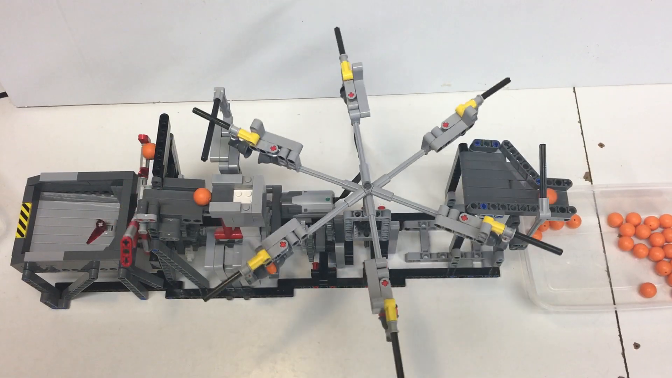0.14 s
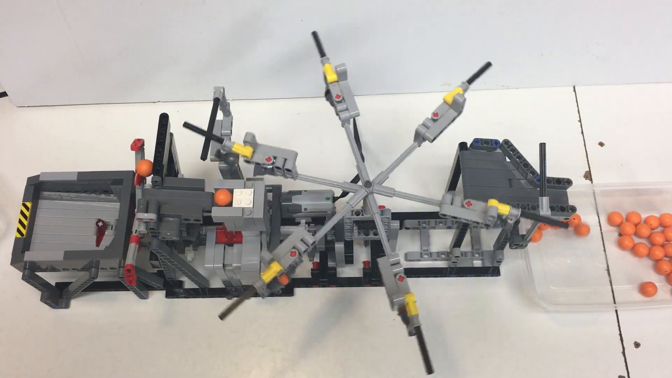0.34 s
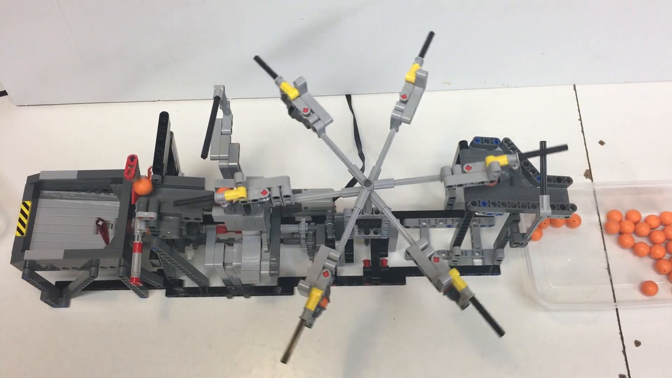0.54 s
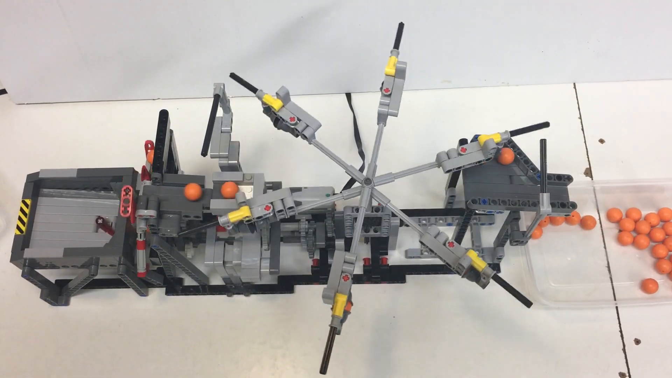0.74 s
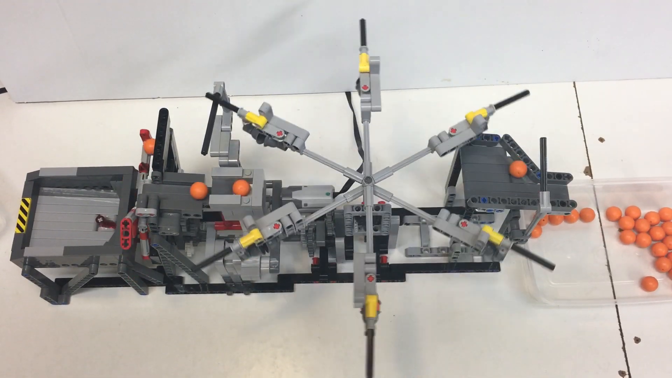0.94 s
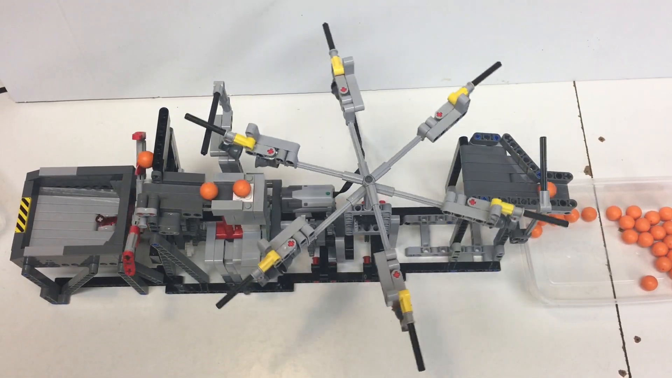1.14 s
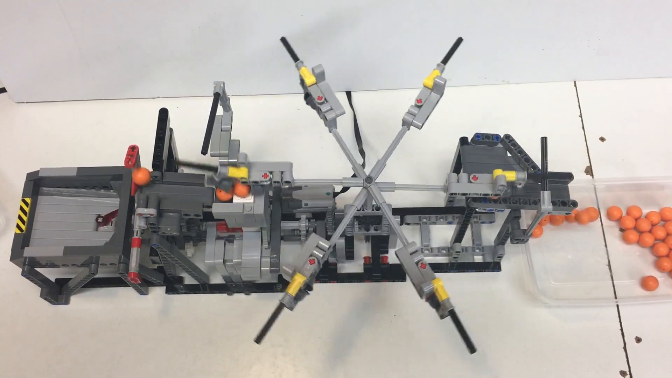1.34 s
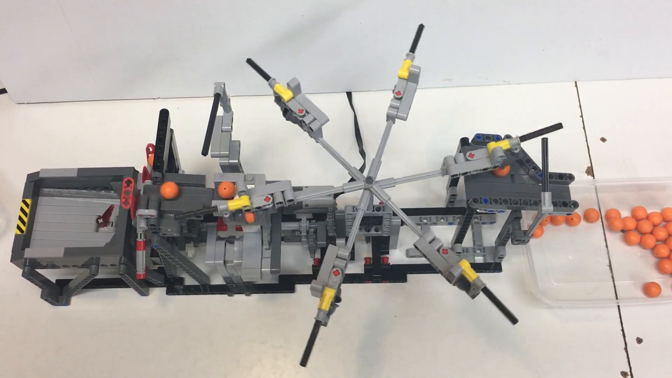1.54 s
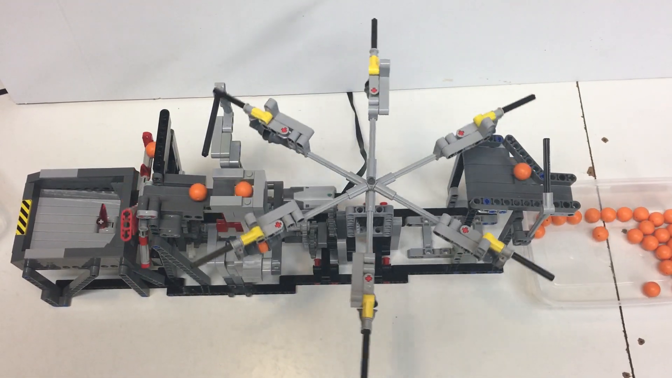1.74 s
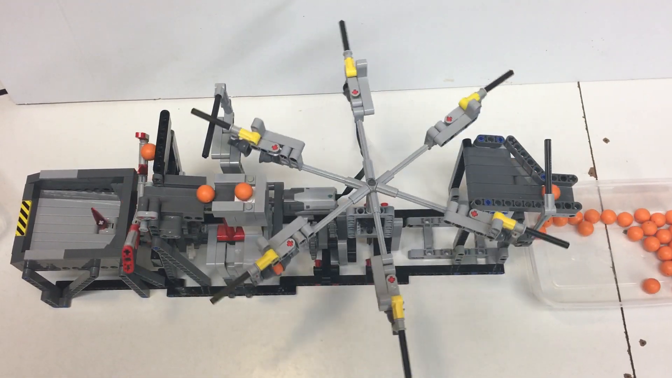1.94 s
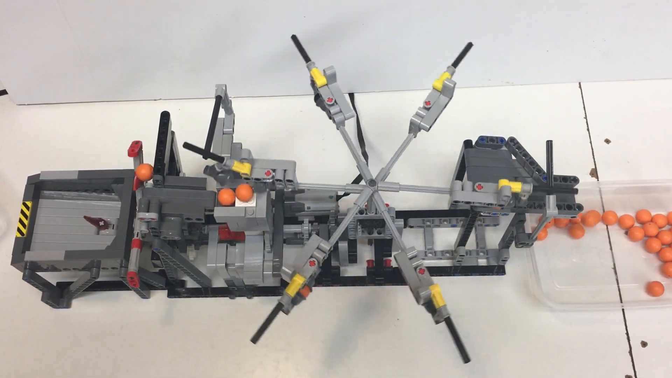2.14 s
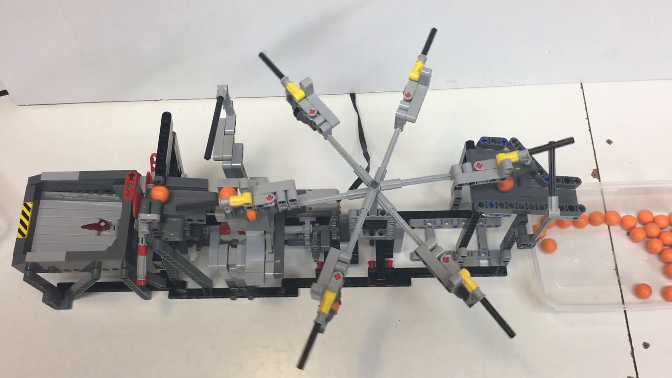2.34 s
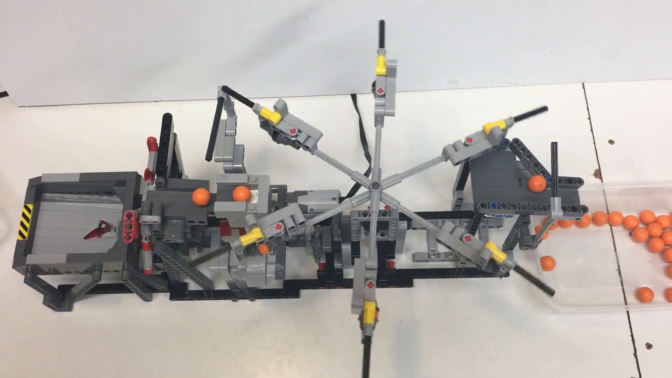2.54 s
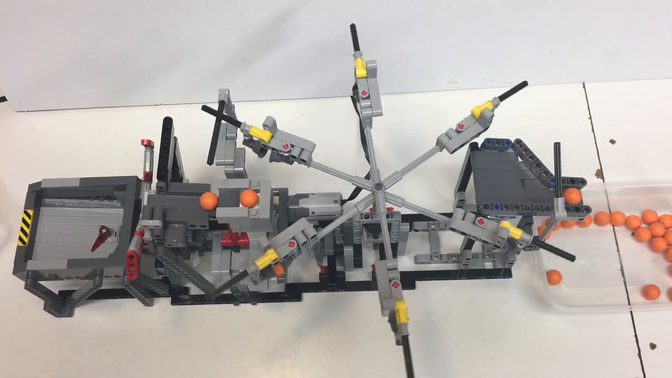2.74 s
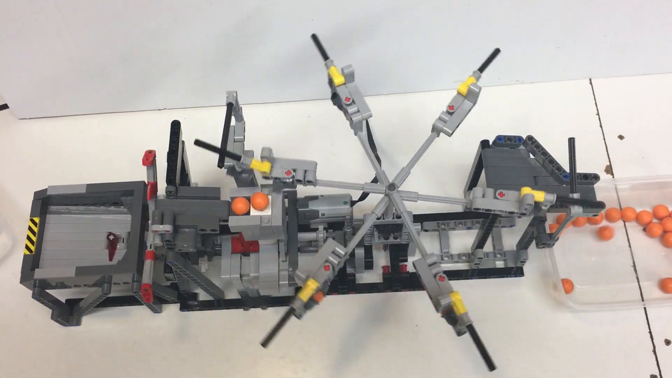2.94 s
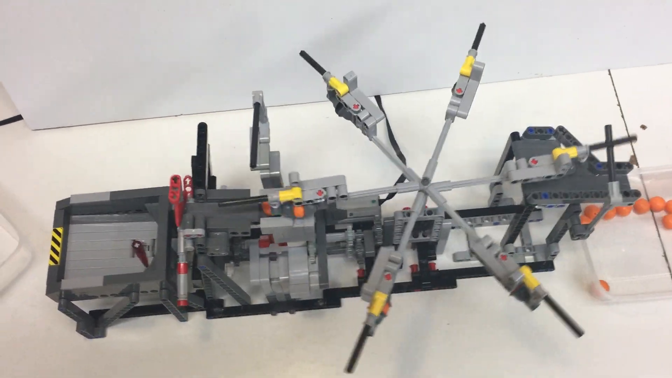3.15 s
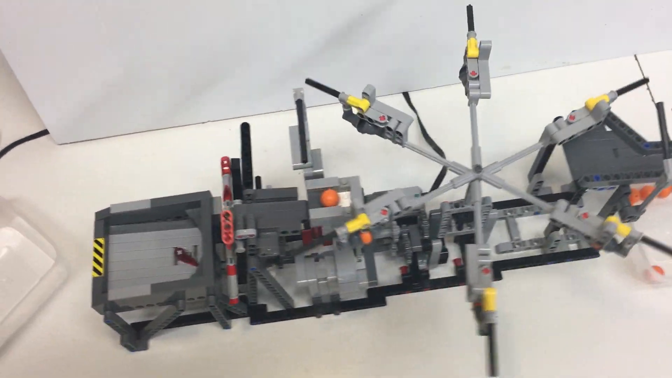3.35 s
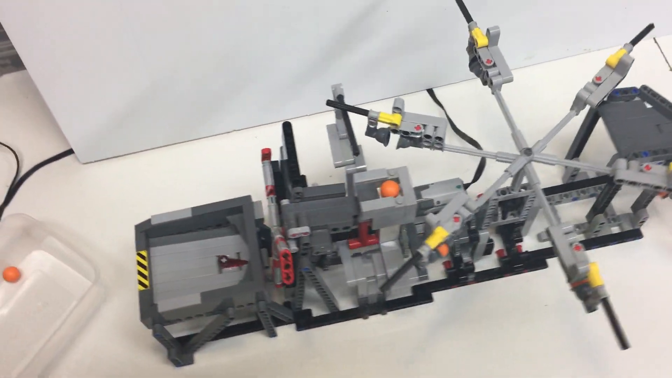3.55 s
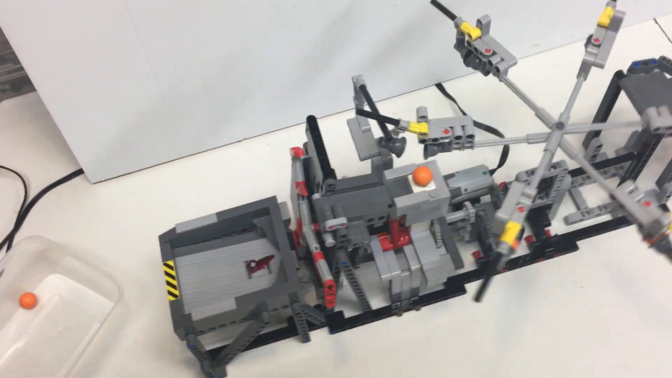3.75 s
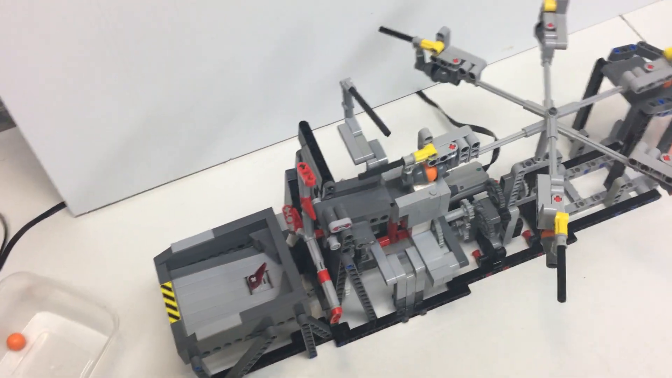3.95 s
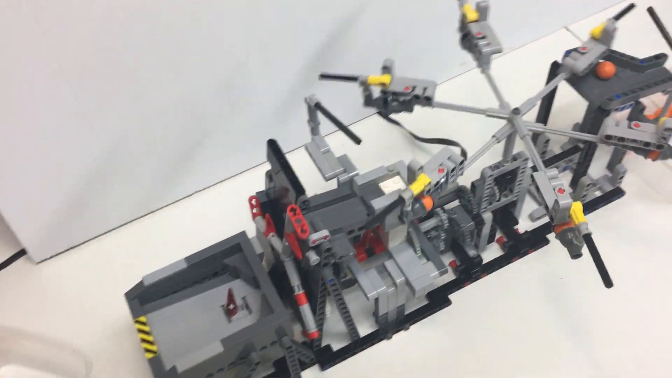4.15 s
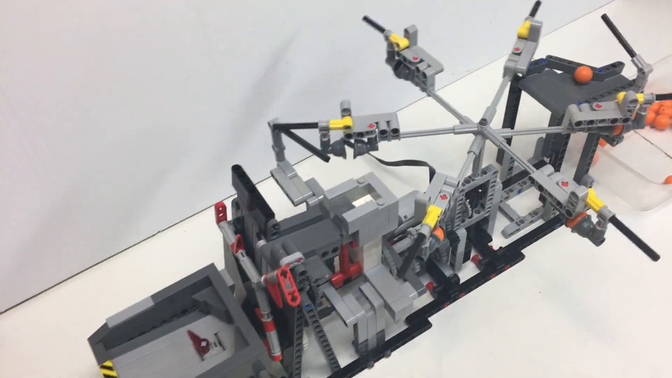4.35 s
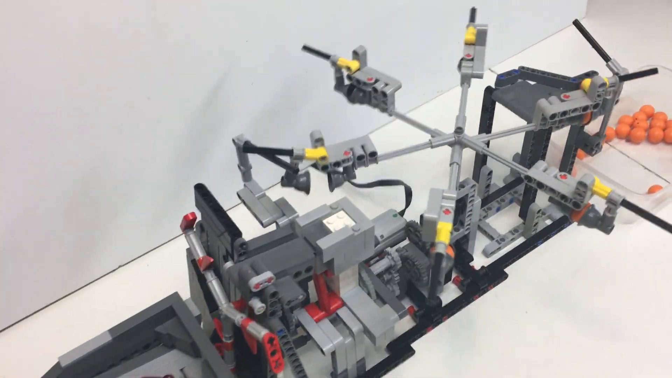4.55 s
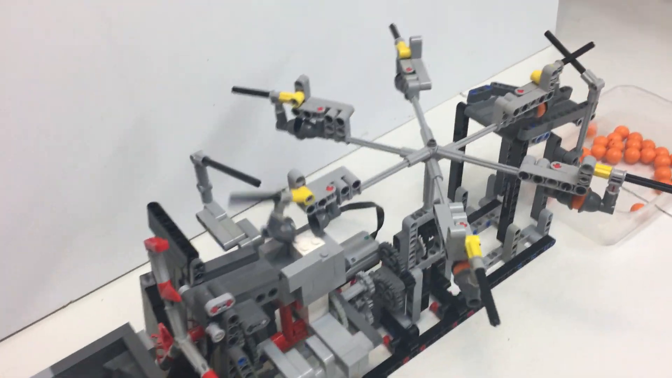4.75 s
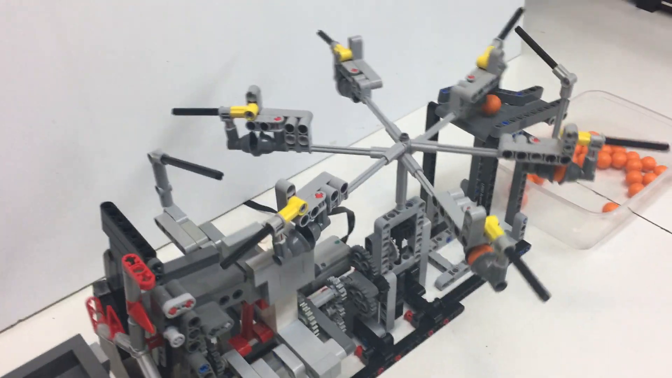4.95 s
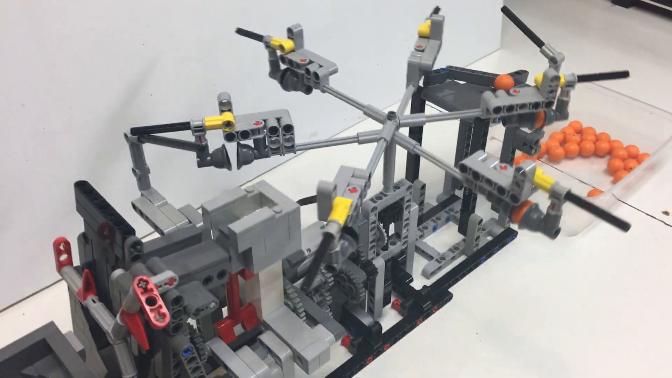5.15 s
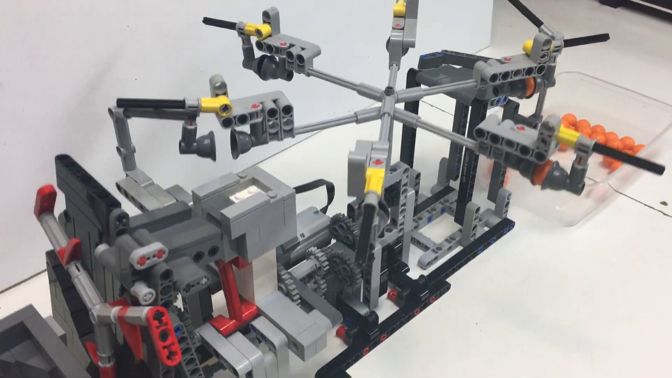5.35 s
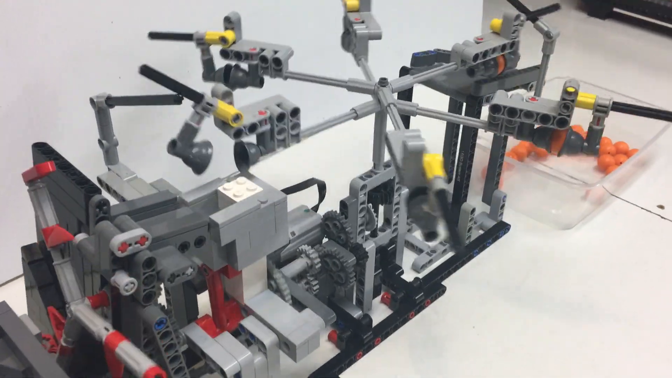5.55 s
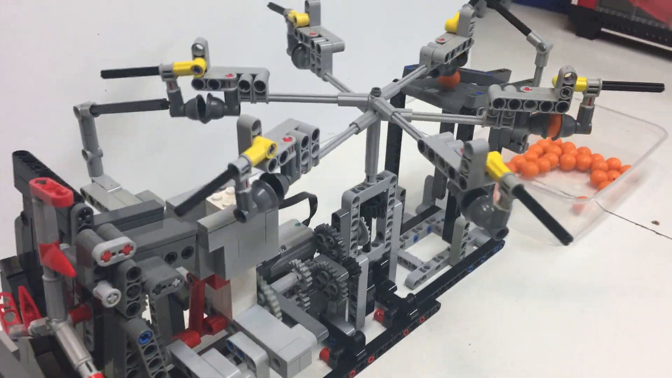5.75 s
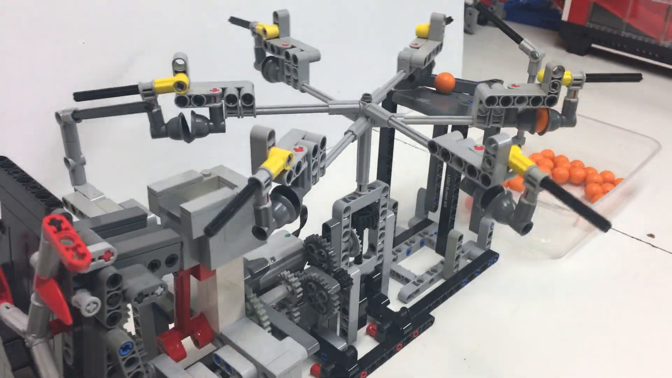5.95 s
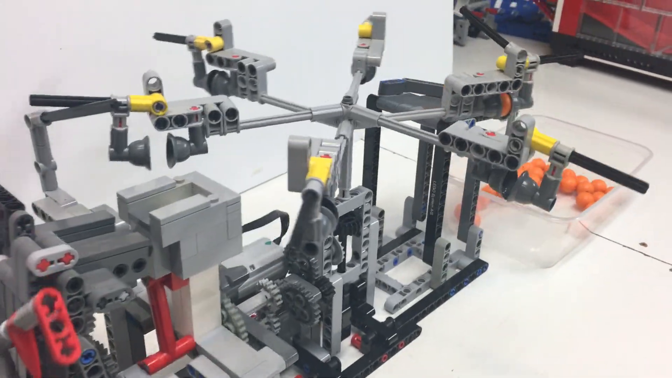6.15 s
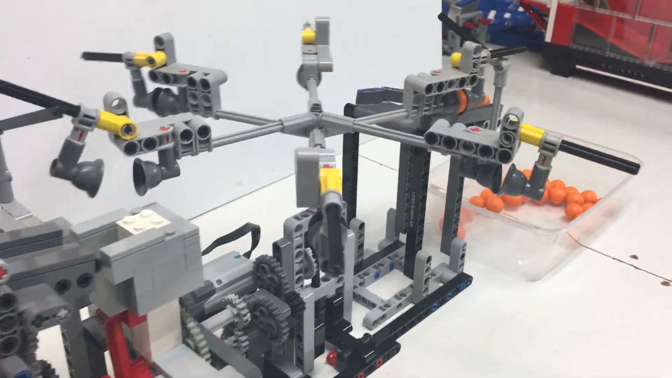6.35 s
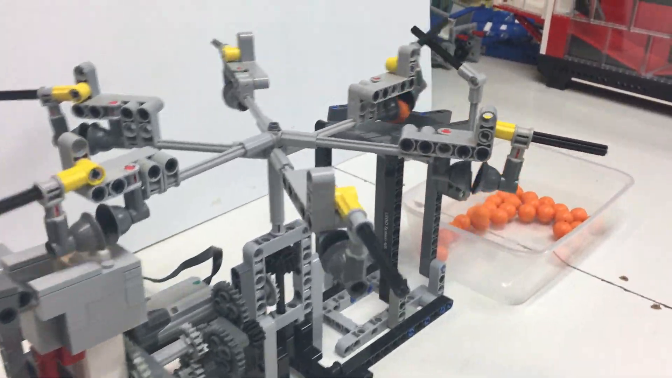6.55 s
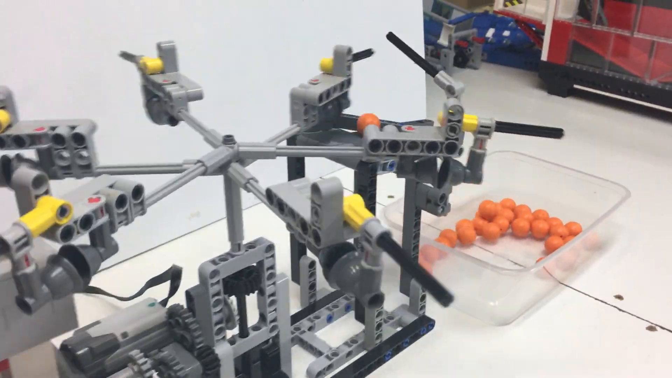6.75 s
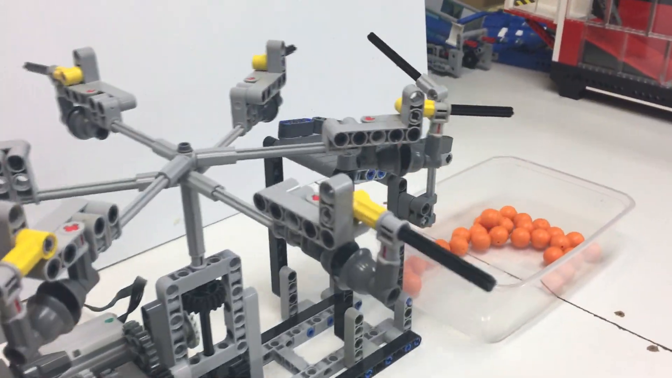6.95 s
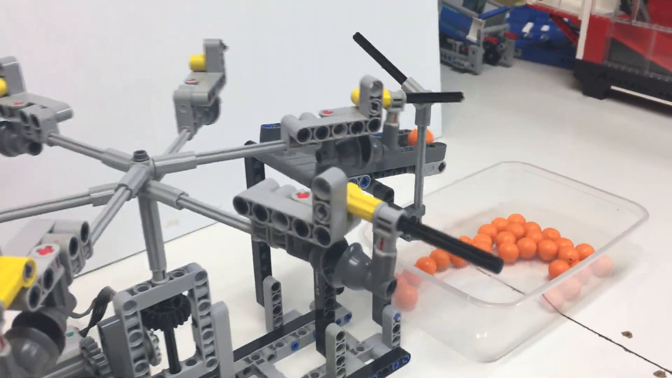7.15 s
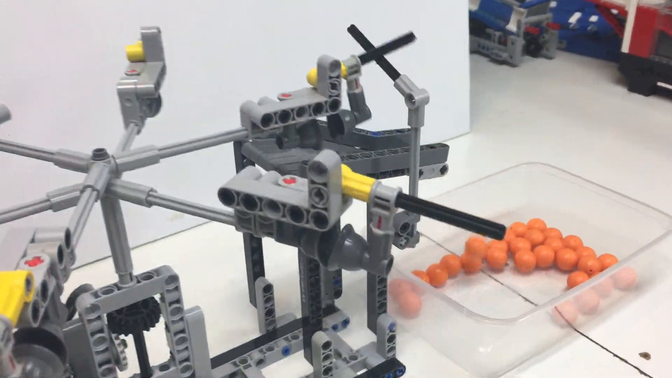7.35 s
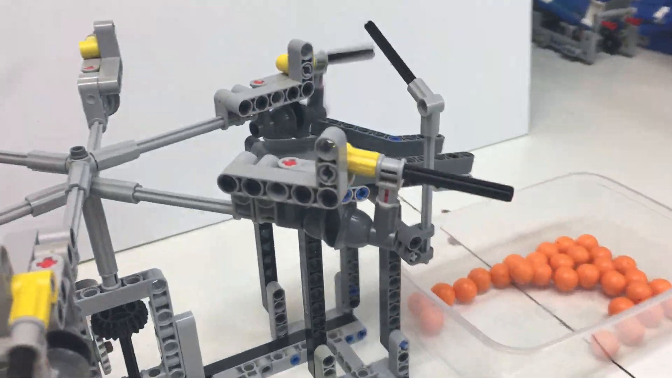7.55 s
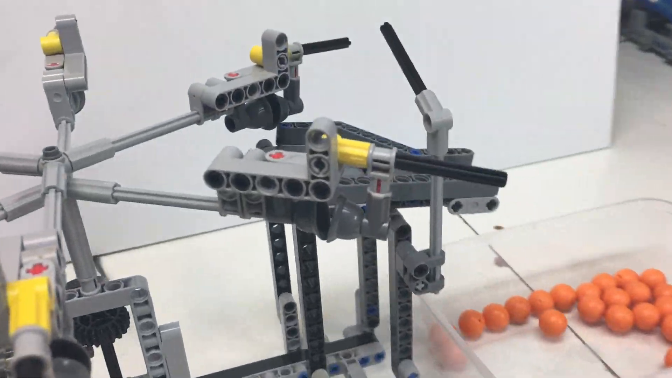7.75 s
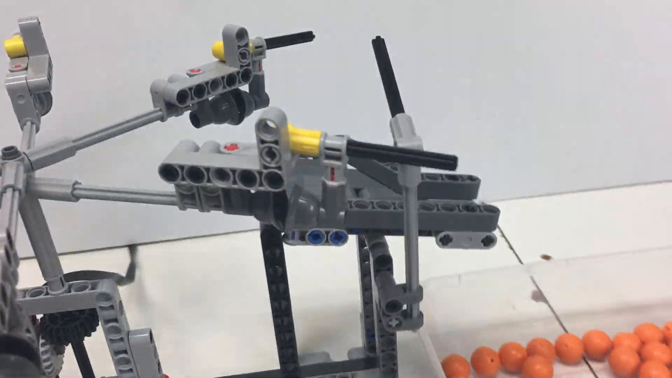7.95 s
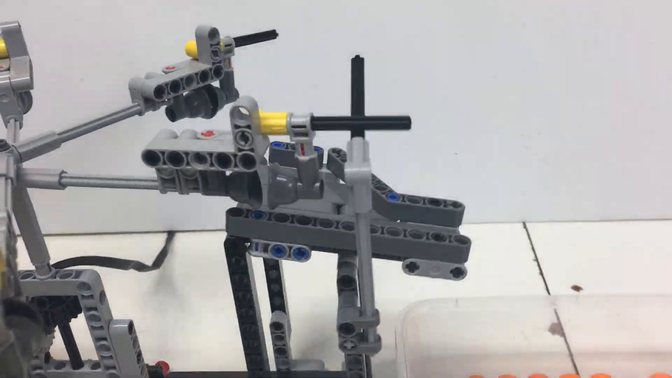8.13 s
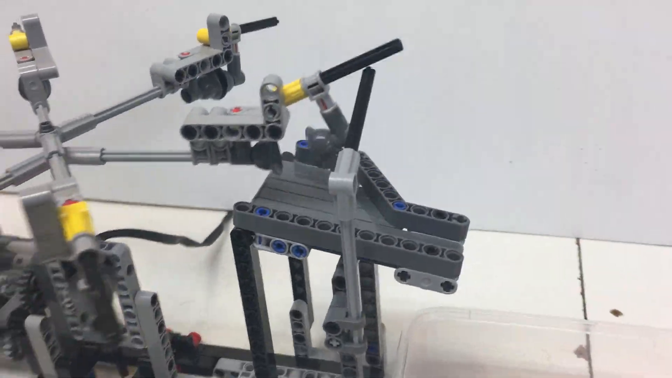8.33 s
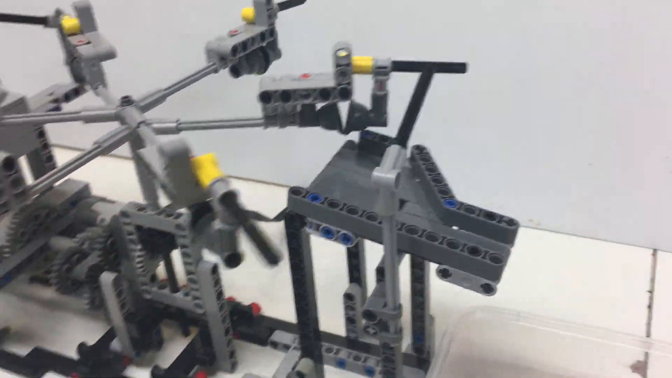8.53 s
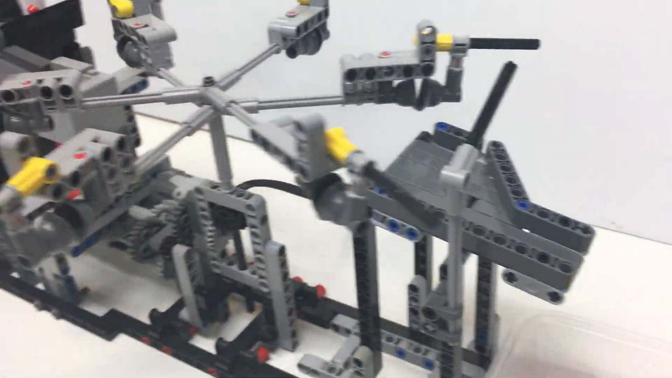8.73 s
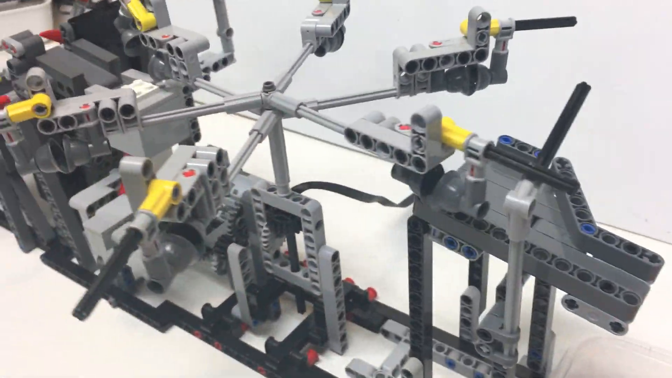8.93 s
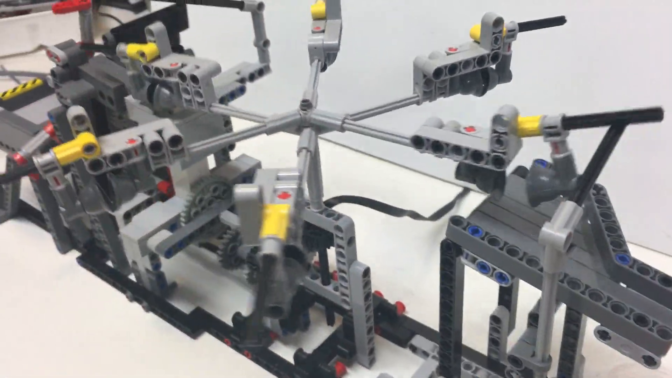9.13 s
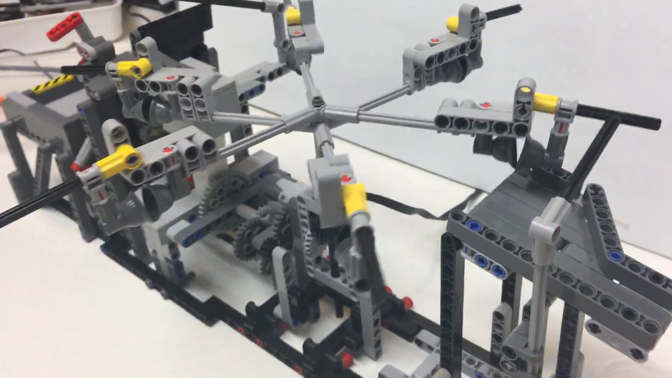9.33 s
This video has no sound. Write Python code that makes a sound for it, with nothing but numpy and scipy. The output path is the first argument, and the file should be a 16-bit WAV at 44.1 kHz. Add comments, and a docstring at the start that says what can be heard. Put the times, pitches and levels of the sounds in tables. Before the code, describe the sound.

Steady motor whirr and chattering plastic gears, with sharp hollow clacks about every second or less, over faint rumble in a quiet room.

```python
"""On a hard floor a plastic brick machine whirrs while arms snap and balls knock through its frame.
The whirr is noise coloured by the place of a hand-held microphone moving round it, with thin motor tones;
gear teeth and one tight spot on a wheel strike the gear case's modes; blows excite frame and base plate.
A short diffuse tail follows ticks and knocks. Low rumble lies beneath, and an engine outside, a sum of
sine orders of its firing rate, drones during the first seconds."""
import sys
import numpy as np
from scipy import signal
from scipy.io import wavfile
from scipy.ndimage import uniform_filter1d

SR = 44100
rng = np.random.default_rng(int(sys.argv[2]) if len(sys.argv) > 2 else 0)


def to_wav(sig):
    """Store sig (one row per channel, or 1-D mono) as 16-bit WAV at the path in sys.argv[1].

    Samples outside -1..1 are clipped; the rate is SR.
    """
    pcm = np.clip(np.atleast_2d(sig), -1, 1) * 32767
    pcm = np.round(pcm).astype(np.int16)
    wavfile.write(sys.argv[1], SR, pcm.T)  # frames by channels


N = 418509
T = np.arange(N) / SR  # time in seconds

# The microphone's walk. Each row: time in seconds, whirr level in dB, place from 0 (above)
# round to 3 (behind), gear case level in dB.
WALK = [(0, -43.5, 0.59, -51), (1.2, -44, 0.57, -56), (2.8, -44, 0.63, -50.5), (3.6, -46, 1.15, -60),
        (4.6, -45.5, 2.09, -52), (5.4, -43, 2.06, -108), (6.3, -42.5, 2.08, -51.5), (7.1, -42, 2.09, -46),
        (7.9, -41.5, 2.42, -50.5), (9.49, -44.5, 2.27, -46.5)]
WALK_S, WHIRR_DB, PLACE, CASE_DB = np.transpose(WALK)
# Spectrum of the whirr at each of four places along the walk.
# Each row of a place: frequency in Hz, relative level in dB per Hz.
VIEWS = [
    [(350, -42), (600, -5), (717, -26), (778, -25), (868, -7), (1220, -6), (1920, -2), (2560, -9),
     (2870, -28), (3200, -12), (3810, 13.5), (5820, -4.5), (6670, -18), (8420, 6), (10200, -21),
     (12500, -8), (15800, -15)],
    [(350, -46), (600, -3), (660, 4), (833, -8), (943, -10), (1130, 3), (1360, 1.5), (2140, 9.5),
     (2560, -2.5), (3600, 0.5), (5000, 5.5), (5900, 10.5), (8190, -3.5), (11700, 1), (15800, -5.5)],
    [(350, -53), (600, -8), (757, -15), (1130, -2), (1270, -3.5), (1650, -1), (2200, 0), (2550, -7.5),
     (2850, -12), (3200, -6), (3700, 5), (5140, -0.5), (7050, 0), (7650, -9), (8650, -3.5), (11500, -5),
     (15800, -9)],
    [(350, -83), (600, -7.5), (845, -29), (956, -28), (1290, -5.5), (1500, -28), (1870, -25), (2290, -21.5),
     (2460, -20), (2860, -15), (3600, 11), (4310, -22), (5660, 7.5), (13200, -14.5), (15800, -17)],
]
# Modes of the gear case. Each row: frequency in Hz, width in Hz, relative level in dB.
CASE = [(3315, 185, -4.5), (3683, 75, -3.5), (5600, 550, -2), (6500, 230, -3.5), (1950, 700, -11),
        (4800, 120, -7.5)]
# Rotation of one gear wheel, a little slow at first.
# Each row: time in seconds, turns of its tight spot past the mesh.
WHEEL = [(-.103, -2), (.241, 0), (2.133, 11), (2.818, 15), (9.643, 55)]
WHEEL_S, WHEEL_TURNS = np.transpose(WHEEL)


def gain_of(db):
    """Level to amplitude: 20 dB is a factor of ten."""
    return 10 ** (np.asarray(db) / 20)


def decay(t, t60):
    """Exponential damping: the amplitude falls 60 dB in t60 seconds."""
    return gain_of(-60 * t / t60)


def rise(t, tau):
    """Exponential onset: the amplitude approaches 1 with time constant tau in seconds."""
    return 1 - np.exp(-t / tau)


def evened(x):
    """Power normalisation: scales to rms 1."""
    return x / np.sqrt(np.mean(x ** 2) + 1e-20)


def peaked(x):
    """Amplitude normalisation: scales to a peak of 1."""
    return x / abs(x).max()


def read(points, hz):
    """Spectral envelope: levels joined by straight lines over log frequency."""
    f, value = np.transpose(points)
    return np.interp(np.log(hz + 1), np.log(f + 1), value)


def add(mix, s, sound):
    """Superposition: adds a sound to the mix at s seconds."""
    part = mix[round(s * SR):][:len(sound)]
    part += sound[:len(part)]


def band(x, low_hz, high_hz):
    """Causal band-pass filtering."""
    edges = [low_hz, min(high_hz, SR / 2.1)]
    return signal.sosfilt(signal.butter(2, edges, "band", fs=SR, output="sos"), x)


def smoothed(x, bins, frames):
    """Moving average over frequency bins and time frames, normalised to rms 1."""
    return evened(uniform_filter1d(uniform_filter1d(x, size=bins, axis=0), size=frames, axis=1))


def noise(field_db, size, patchy_db, shared_db, bands_db):
    """Short-time synthesis: random spectra shaped by field_db(hz, s) and by fluctuating levels."""
    frames, hz = 4 * N // size + 5, np.fft.rfftfreq(size, 1 / SR)
    a, b, patches, bands = rng.standard_normal((frames, len(hz), 4)).T  # each: bins by frames
    bands = smoothed(bands, bins=3, frames=400)  # narrow and slowly shifting
    patches = smoothed(patches, bins=6, frames=8)
    # one flicker over time, common to all frequencies
    flicker = evened(uniform_filter1d(rng.standard_normal(frames), size=4))
    db = field_db(hz[:, None], np.arange(frames) * size / 4 / SR)
    db = db + patchy_db * patches + shared_db * flicker + bands_db * bands
    spectra = (a + 1j * b) * gain_of(db)
    return signal.istft(spectra, nperseg=size, noverlap=3 * size // 4)[1][:N]


def ring(modes, t, chance, weight_db, spread_db):
    """Modal superposition: damped sines, each with a random strength, tuning and phase."""
    hz, db, t60 = np.transpose(modes)[:, :, None]
    strength, tune, phase = chance[:, :len(modes), None]
    gain = gain_of(db + weight_db + spread_db * strength - 60 * t / t60)
    return (gain * np.sin(2 * np.pi * hz * (1 + 0.015 * tune) * t + 2 * phase)).sum(0)


def whirr():
    """Directional radiation: dense motor and gear noise whose spectrum follows the viewpoint."""
    def field_db(hz, t):
        at = np.clip(np.interp(t, WALK_S, PLACE), 0, len(VIEWS) - 1)
        # cross-fade between the two nearest places
        return sum(np.maximum(1 - abs(at - k), 0) * read(view, hz) for k, view in enumerate(VIEWS))

    hiss = noise(field_db, size=512, patchy_db=1.5, shared_db=1.5, bands_db=1.3)
    running_rms = np.sqrt(uniform_filter1d(hiss ** 2, size=SR))  # over one second
    return gain_of(np.interp(T, WALK_S, WHIRR_DB)) * hiss / running_rms


def teeth(per_s=320, uneven_db=3.0):
    """Random impulse excitation: each tooth tick rings one gear case mode; some also click wide."""
    struck = rng.random(N) < per_s / SR
    size = struck * gain_of(uneven_db * np.minimum(rng.exponential(1, N), 3))
    turn = np.interp(T, WHEEL_S, WHEEL_TURNS)
    size *= gain_of(4.0 * np.cos(3 * 2 * np.pi * (turn - .03)))  # the mesh tightens three times a turn
    mode, t = rng.integers(0, len(CASE), N), T[:1500]
    ringing = np.zeros(N)
    for k, (hz, width, db) in enumerate(CASE):
        # a resonance of this width decays at pi times the width
        response = gain_of(db) * rise(t, 0.00022) * np.exp(-np.pi * width * t) * np.sin(2 * np.pi * hz * t)
        ringing += signal.oaconvolve(size * (mode == k), response)[:N]
    click = band(rng.standard_normal(len(t)), 2700, 15000) * decay(t, 0.017)
    clicks = signal.oaconvolve(size * (mode % 3 == 0), click)[:N]
    rattle = evened(ringing) + gain_of(-13.5) * evened(clicks)
    return gain_of(np.interp(T, WALK_S, CASE_DB)) * rattle


def whine():
    """Narrow-band resonance: noise through narrow filters gives fuzzy motor tones."""
    # Each row: frequency in Hz, width in Hz, rms level in dB.
    tones = [(850, 9.1, -72.5), (1657, 3.3, -71), (2417, 48, -62.5), (3790, 68, -73)]
    out = np.zeros(N)
    for hz, width, db in tones:
        tone = band(rng.standard_normal(N), hz - width / 2, hz + width / 2)
        out += gain_of(db) * evened(tone)
    return out


def air():
    """Broadband background: steady low-frequency noise is the rumble of the room and the street."""
    # Each row: frequency in Hz, relative level in dB per Hz.
    rumble_spectrum = [(12, -58), (20, -39), (40, -2), (59, 1.5), (172, -7), (290, -12.5), (375, -11.5),
                       (476, -13.5), (567, -50), (805, -59.5), (900, -11), (1170, -86), (1980, -120)]
    rumble = noise(lambda hz, t: read(rumble_spectrum, hz) + 0 * t, size=2048,
                   patchy_db=3.0, shared_db=0.9, bands_db=0)
    return gain_of(-56) * evened(rumble)


def engine():
    """Harmonic orders: multiples of the firing rate, sinking in pitch as the vehicle leaves."""
    # Each row: time in seconds, firing rate in Hz, 4th order rms level in dB, 5th order rms level in dB.
    engine_course = [(0.0, 32, -51.5, -45), (0.36, 31.5, -57, -56.5), (1.34, 30.27, -55.5, -67.5),
                     (2.37, 28.7, -103, -62), (3.2, 26.5, -68, -66)]
    # Weaker orders. Each row: multiple of the firing rate, level in dB relative to the 4th order
    # at the start, fading in dB per second.
    weak_orders = [(3, -7, 4), (7, -6, 5), (8, -3, 24)]
    s, hz, fourth_db, fifth_db = np.transpose(engine_course)
    cycles = np.cumsum(np.interp(T, s, hz)) / SR
    levels = [(4, np.interp(T, s, fourth_db)), (5, np.interp(T, s, fifth_db))]
    levels += [(round(k), fourth_db[0] + db - fade_db * T) for k, db, fade_db in weak_orders]
    fade_out = np.clip((s[-1] - T) / 0.32, 0, 1)
    drone = sum(gain_of(db) * np.sin(2 * np.pi * (k * cycles + rng.random())) for k, db in levels)
    return np.sqrt(2) * fade_out * drone  # sqrt(2) turns rms into sine amplitude


def blows():
    """Size scaling: smaller parts sound brighter and ring higher; crack and shudder follow pitch and place."""
    # Blows of arms and balls. Each row: start in seconds, blow level in dB, brightness in dB,
    # base plate thud in dB relative to the blow.
    blow_list = [(0.042, -22, -14, -22), (0.053, -28, -16, -14), (0.091, -23.5, -7.5, -34),
                 (0.492, -8, -14, -18.5), (0.523, -29, -10, -21), (0.544, -29, -18, -29),
                 (0.636, -25, -9, -25), (0.654, -12, -16, -20), (0.69, -20.5, -7.5, -27),
                 (0.728, -20, -11, -28), (0.748, -19, -19.5, -21), (0.786, -25.5, -11.5, -12.5),
                 (0.867, -23.5, -7, -28), (0.897, -22, -8, -32), (1.103, -32, -3, -36),
                 (1.212, -30.5, -10, -25), (1.325, -34, -6.5, -27), (1.346, -26.5, -7, -29),
                 (1.508, -7, -12.5, -19), (1.533, -25, -7, -15), (1.548, -25, -12, -28),
                 (1.557, -20, -9, -28), (1.597, -20, -10.5, -25), (1.628, -32, -12, -21),
                 (1.645, -14, -18, -26), (1.664, -31, -9, -28), (1.675, -27, -11, -25),
                 (1.692, -16, -12, -20), (1.738, -18.5, -11, -24), (1.767, -33, -10, -15),
                 (1.775, -21.5, -10, -30), (1.99, -33, -26, -32), (2.028, -29.5, -8.5, -23),
                 (2.191, -25.5, -5, -34), (2.306, -10.5, -12, -22), (2.318, -10.5, -11.5, -16.5),
                 (2.342, -29, -8, -23), (2.357, -23.5, -23, -20), (2.369, -25, -12, -20),
                 (2.418, -16, -13, -35), (2.425, -24, -19, -18), (2.442, -18, -10.5, -17),
                 (2.484, -17.5, -14, -26), (2.529, -28, -20, -14), (2.562, -23, -7, -20),
                 (2.623, -24, -6.5, -34), (2.647, -38, -19, -27), (2.924, -29.5, -11, -26),
                 (3.06, -9.5, -13, -17.5), (3.1, -25, -15, -17), (3.212, -22.5, -12, -17),
                 (3.222, -16.5, -16.5, -21), (3.238, -29.5, -7, -9), (3.254, -31, -8, -25),
                 (3.281, -30, -15, -16), (3.285, -19.5, -13.5, -26), (3.32, -28.5, -10.5, -15),
                 (4.03, -26, 10, -41), (4.045, -29, -9.5, -32), (4.209, -18, -11, -28),
                 (4.234, -29, -13, -15.5), (4.254, -28, -9, -15), (4.375, -29, -9, -21),
                 (4.63, -32, -16, -21), (4.907, -23.5, -7.5, -34), (4.924, -11.5, -13, -12),
                 (4.941, -28, -7, -21), (4.959, -25, -9, -19), (4.968, -29, -12, -18),
                 (5.057, -21.5, -14, -20), (5.082, -14, -15, -19), (5.093, -24, -13, -12),
                 (5.168, -24.5, -9, -21), (5.188, -21, -13, -15.5), (5.231, -26.5, -16, -13),
                 (5.255, -29.5, -10.5, -19), (5.349, -33.5, -9, -29), (5.613, -43, -3, -15),
                 (5.638, -11.5, -13, -10), (5.667, -25, -18, -15), (5.772, -18, -10.5, -16),
                 (5.797, -27, -20, -20), (5.813, -31.5, -17, -7), (5.841, -21.5, -10, -14),
                 (5.856, -20, -15, -31), (5.885, -23.5, -11.5, -15.5), (5.978, -25.5, -6, -21),
                 (6.626, -25.5, -4.5, -36), (6.646, -10, -15.5, -11.5), (6.716, -22.5, -15, -28),
                 (6.754, -29.5, -14, -19), (6.787, -16, -12.5, -15.5), (6.812, -26.5, -9, -14),
                 (6.849, -23, -9, -13), (6.897, -24.5, -15, -15), (6.911, -29, -19, -23),
                 (7.036, -26.5, -16, -16), (7.083, -27.5, -14, -25), (7.225, -17, -14, -21),
                 (7.253, -26.5, -11, -23), (7.435, -9, -10.5, -10), (7.45, -17.5, -17.5, -20),
                 (7.485, -26, -3, -27), (7.57, -15.5, -11, -15.5), (7.579, -31, -12, -16),
                 (7.637, -22.5, -15, -12), (7.68, -23, -4.5, -21), (7.693, -21, -12.5, -11.5),
                 (7.734, -26, -15, -10.5), (7.757, -30, -13, -13), (7.989, -28.5, -6, -23),
                 (8.089, -38, -23, -8), (8.244, -32, -6.5, -30), (8.347, -28, -6, -39),
                 (8.375, -32, -3, -27), (8.387, -32, -18.5, -19), (8.475, -41, -7, -1),
                 (8.518, -27, -4.5, -30), (9.104, -35, -10, -36), (9.213, -22, -7.5, -37),
                 (9.347, -30, -2, -38), (9.364, -34, -1, -27)]
    # Levels riding on a blow. Each holds: dB for a 2200 Hz part heard from above,
    # dB per octave of the part's pitch, dB per step of place.
    crack_rule, shudder_rule = (-7.5, 5.3, 2.2), (-11.5, -5, 3.1)
    bright_mid_db, bright_db_per_octave = -12.5, 9
    s, db, bright_db, thud_db = np.transpose(blow_list)
    octaves = np.clip((bright_db - bright_mid_db) / bright_db_per_octave, -1, 1)
    place = np.clip(np.interp(s, WALK_S, PLACE), 0, len(VIEWS) - 1)
    crack_db, shudder_db = np.array([crack_rule, shudder_rule]) @ [1 + 0 * s, octaves, place]
    return list(zip(s, db, 2200 * 2 ** octaves, thud_db, crack_db, shudder_db))


def knocks():
    """Impact excitation: a blow rings frame and base plate, with a clack, a crack and shuddering parts."""
    # Modes of frame and base plate. Each row: frequency in Hz, relative level in dB, t60 in seconds.
    frame_modes = [(981, 11, 0.05), (1140, -4, 0.22), (1321, 20.5, 0.016), (1725, 18.5, 0.011),
                   (1990, 9.5, 0.04), (2240, 14.5, 0.015), (2520, -2, 0.06), (2580, 8.5, 0.024),
                   (3117, -2, 0.049), (3232, 17, 0.0063), (3710, 9.5, 0.014), (4440, 7.5, 0.02),
                   (5360, 26, 0.0057), (5790, 17.5, 0.02)]
    plate_modes = [(233.8, -7, 0.14), (295, 4, 0.03), (372.7, -1, 0.087), (427, -2, 0.074),
                   (538, -4, 0.067), (636, -4.5, 0.037), (730, -3, 0.0047)]
    frame_hz = np.array(frame_modes)[:, :1]
    t, out = T[:6000], np.zeros(N)
    for s, db, hz, thud_db, crack_db, shudder_db in blows():
        chance = rng.standard_normal((3, 20))
        grit, dust, clumps = rng.standard_normal((3, len(t)))
        # small, high parts shake only the modes close to their own pitch (dB per squared octave)
        near_db = 7.2 * (hz / 2200) ** 2
        octaves_off = np.log2(frame_hz / hz)
        frame = peaked(ring(frame_modes, t, chance, -near_db * octaves_off ** 2, spread_db=2.5))
        clack = peaked(band(grit, hz / 2.3, hz * 2.5) * decay(t, 0.021))
        struck = (frame + gain_of(-near_db / 1.5) * clack) * rise(t, 0.0007)
        body = peaked(band(struck, 700, 12000))
        thud = peaked(band(ring(plate_modes, t, chance[::-1], 0, spread_db=2), 200, 900))
        crack = peaked(band(dust, 4730, 9800) * decay(t, 0.011))
        snap = peaked(band(grit, 9600, 17700) * decay(t, 0.0085))
        crack += gain_of(-6.5) * snap
        # loose pins chatter in clumps
        clumps = np.clip(evened(uniform_filter1d(clumps, size=80)), -2, 2)
        chatter = band(band(dust * gain_of(1.6 * clumps), 660, 3200), 350, 10500)
        shudder = 0.72 * chatter * decay(t, 0.15) * rise(t, 0.0019)
        knock = body + gain_of(thud_db) * thud + gain_of(crack_db) * crack + gain_of(shudder_db) * shudder
        add(out, s, gain_of(db) * knock)
    return out


def wheel_ticks():
    """Periodic excitation: once a turn the tight spot rings two case modes, louder with the whirr."""
    tick_db, uneven_db, click_db = -33.5, 4.5, -4.5
    follows_whirr = 0.27  # dB per dB of whirr
    at = np.interp(np.arange(WHEEL_TURNS[0] + 1, WHEEL_TURNS[-1]), WHEEL_TURNS, WHEEL_S)
    whirr_db = np.interp(at, WALK_S, WHIRR_DB)
    t, out = T[:1500], np.zeros(N)
    modes = [(hz, db, 2.2 / width) for hz, width, db in CASE[:2]]  # t60 is 2.2 over the width
    for s, follow_db in zip(at, follows_whirr * (whirr_db - whirr_db.mean())):
        chance, dust = rng.standard_normal((3, 3)), rng.standard_normal(len(t))
        case = peaked(ring(modes, t, chance, 0, spread_db=3) * rise(t, 0.0005))
        click = peaked(band(dust, 3000, 10000) * decay(t, 0.012))
        level_db = tick_db + follow_db + uneven_db * chance[0, 2]
        add(out, s, gain_of(level_db) * (case + gain_of(click_db) * click))
    return out


def room(x, t60=0.25):
    """Diffuse reverberation: convolution with decaying noise, duller as it dies."""
    t = T[:SR // 2]
    grit = rng.standard_normal((2, len(t))) * (t > .003)  # a gap before the first reflections
    tail = band(grit[0], 160, 5400) * decay(t, t60)
    tail += 1.9 * band(grit[1], 7100, 17000) * decay(t, t60 / 1.5)  # the treble dies sooner
    return signal.oaconvolve(x, tail / np.linalg.norm(tail))[:N]


def scene():
    """Superposition of direct sound, reverberation and background."""
    near = knocks() + wheel_ticks() + teeth()
    return (near + gain_of(-9.0) * room(near) + whirr() + whine() + air() + engine())[None]


def record(dry):
    """Band limiting: a small microphone without deep bass, then a low-pass at the upper edge."""
    edge_hz = 15800
    thin = signal.sosfilt(signal.butter(2, 45, "high", fs=SR, output="sos"), dry)
    low_pass = signal.firwin(511, edge_hz, window=("kaiser", 9), fs=SR)
    return signal.oaconvolve(thin, low_pass[None], "same")


dry = scene()
out = record(dry)
to_wav(out)
```